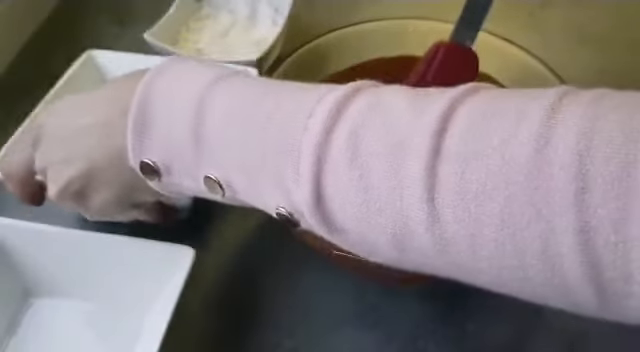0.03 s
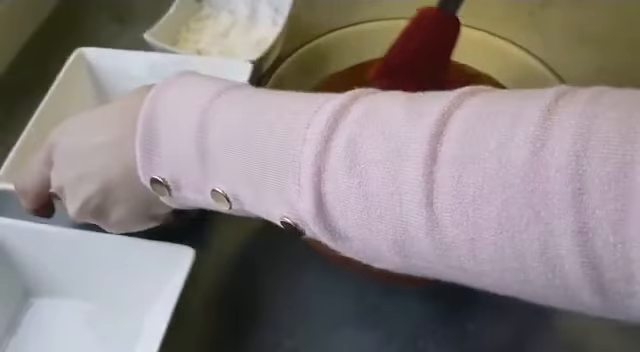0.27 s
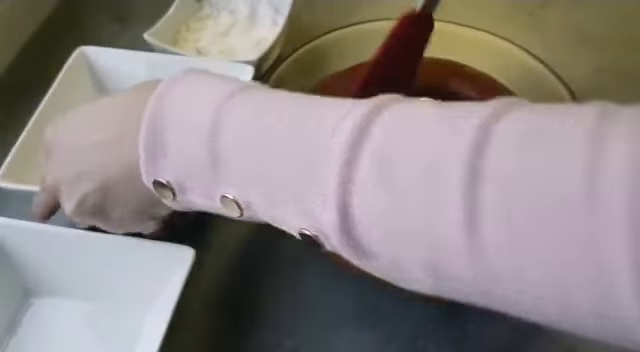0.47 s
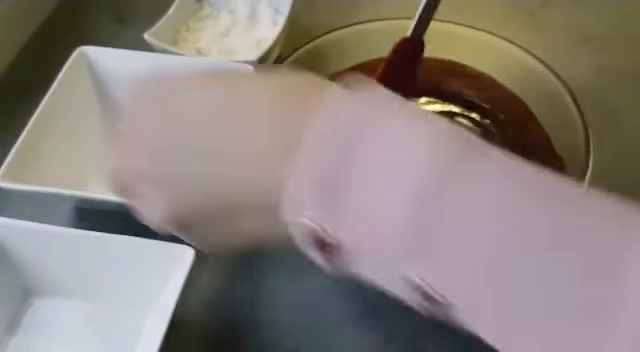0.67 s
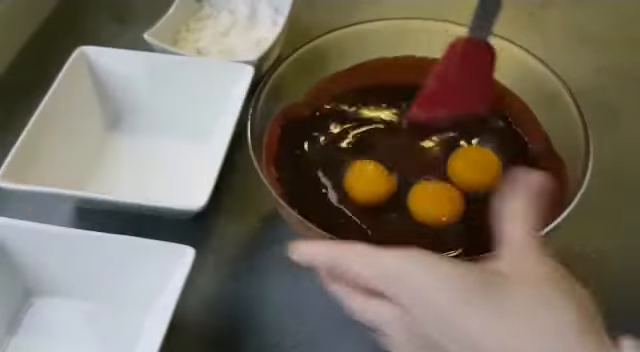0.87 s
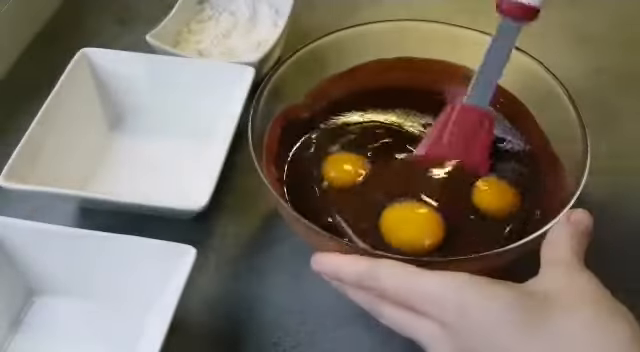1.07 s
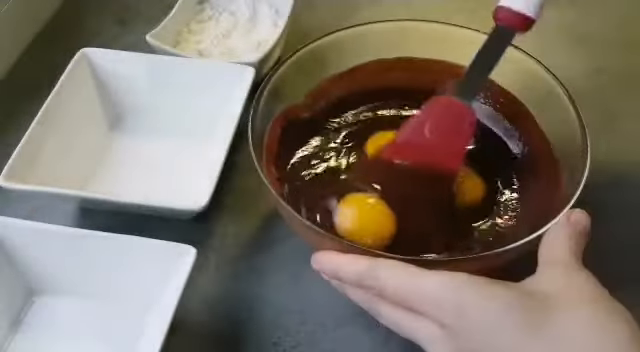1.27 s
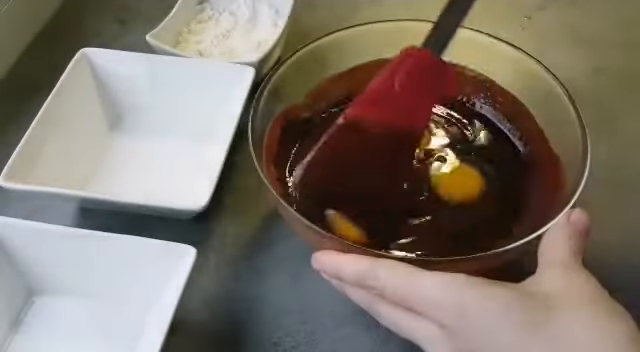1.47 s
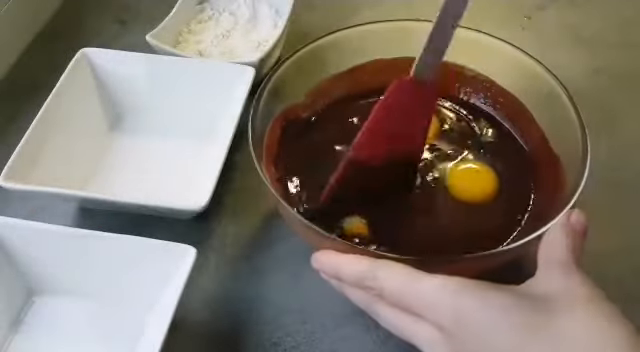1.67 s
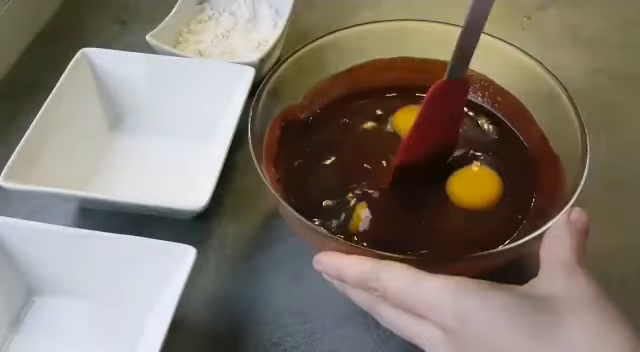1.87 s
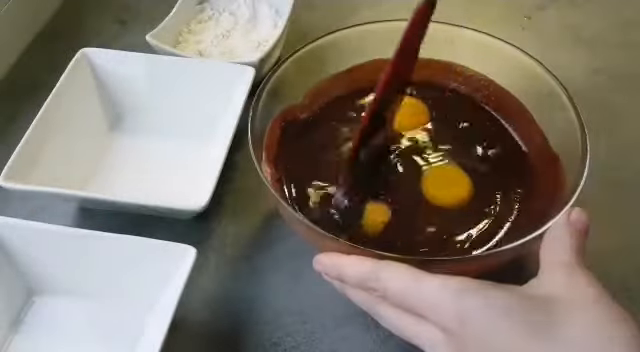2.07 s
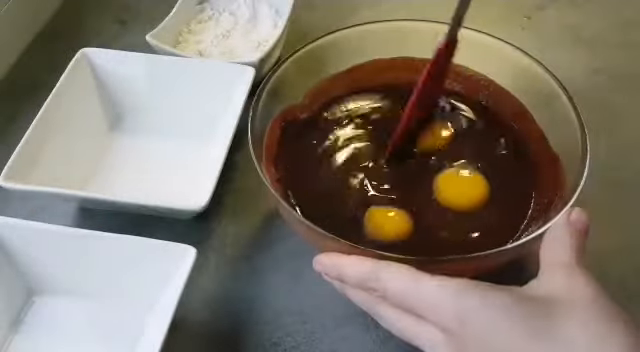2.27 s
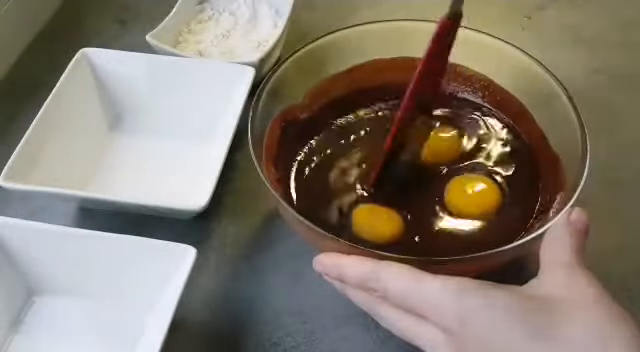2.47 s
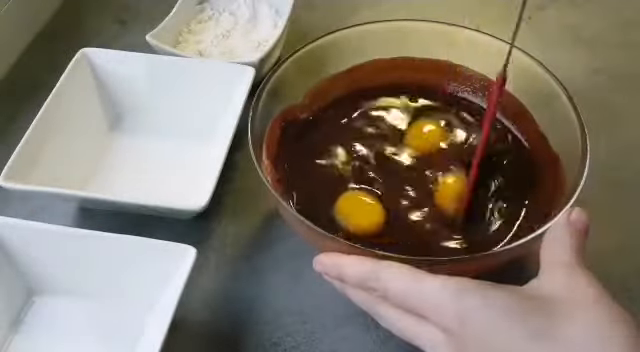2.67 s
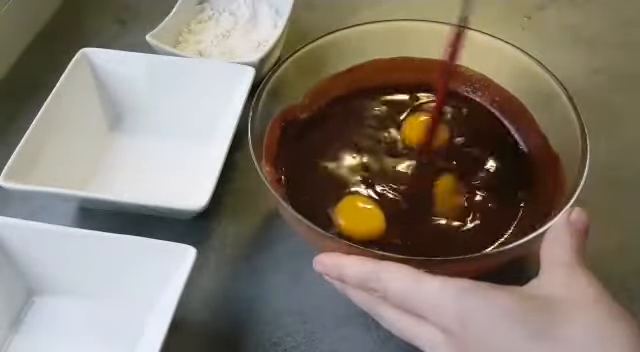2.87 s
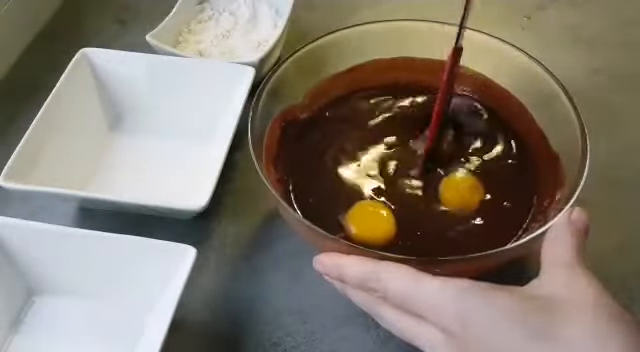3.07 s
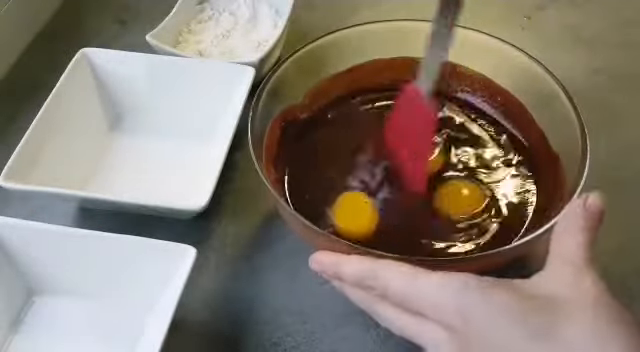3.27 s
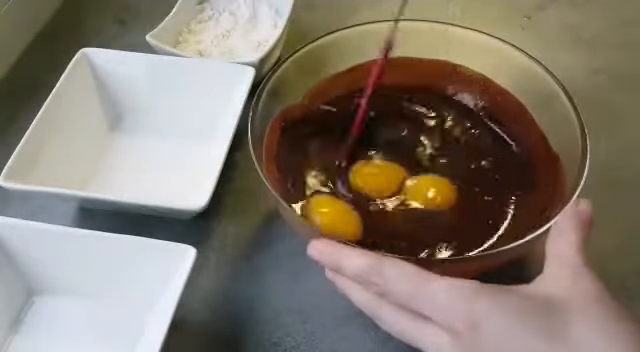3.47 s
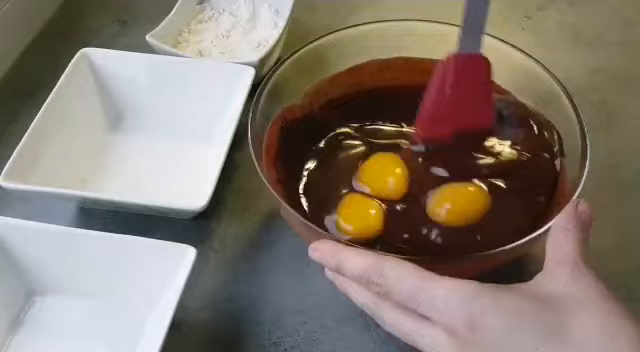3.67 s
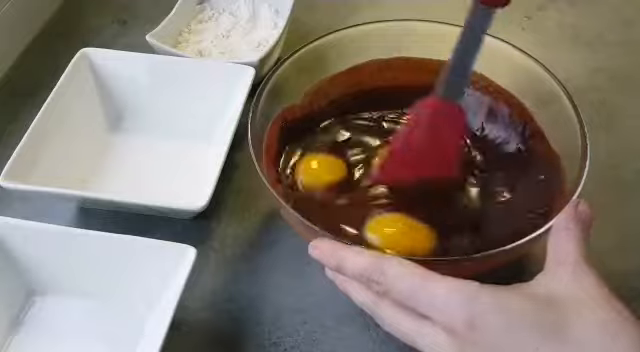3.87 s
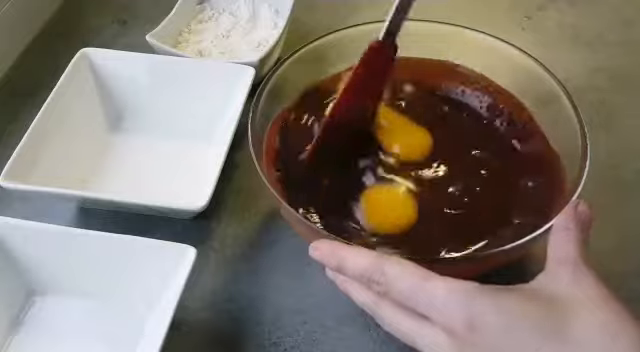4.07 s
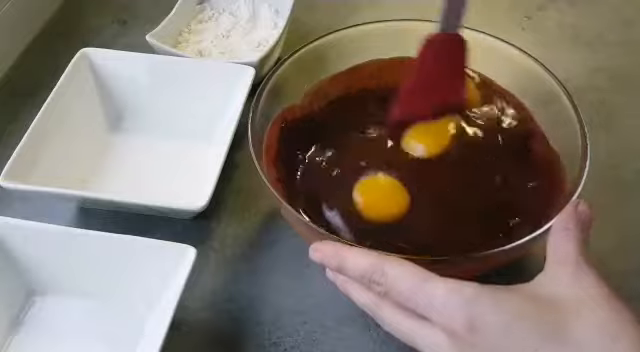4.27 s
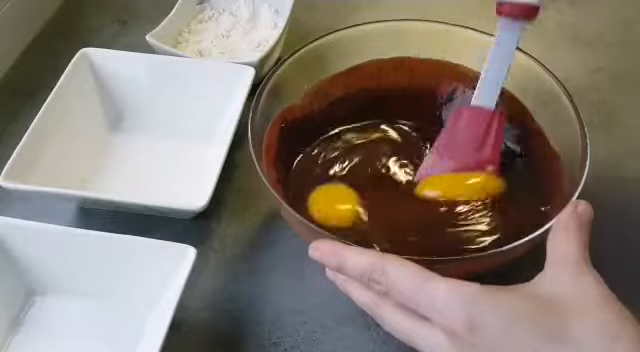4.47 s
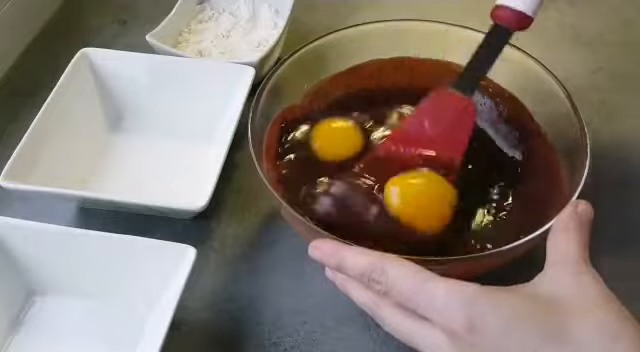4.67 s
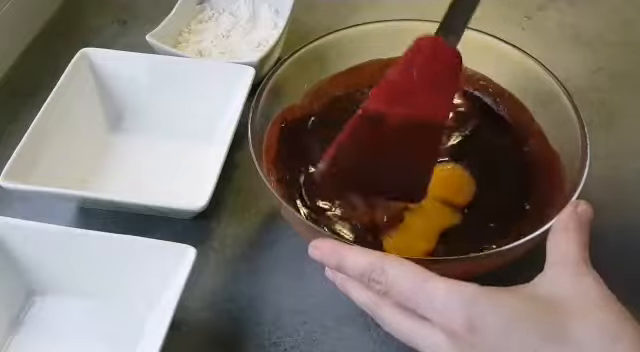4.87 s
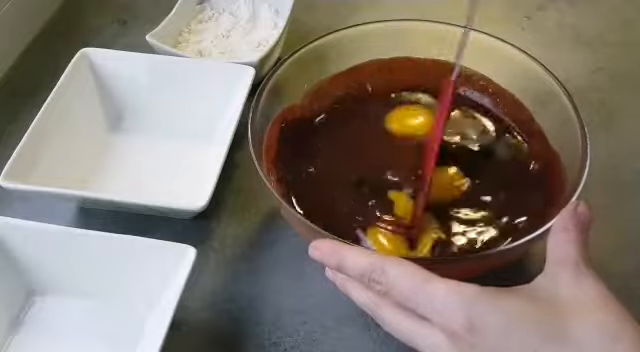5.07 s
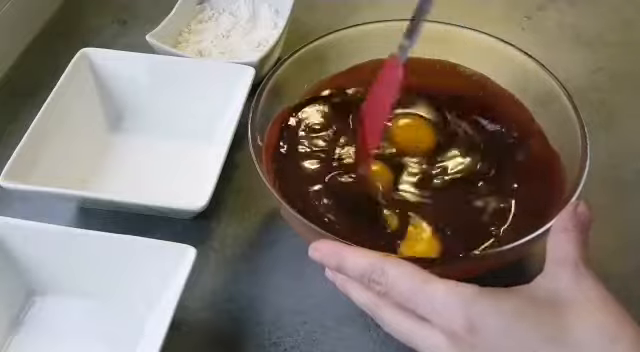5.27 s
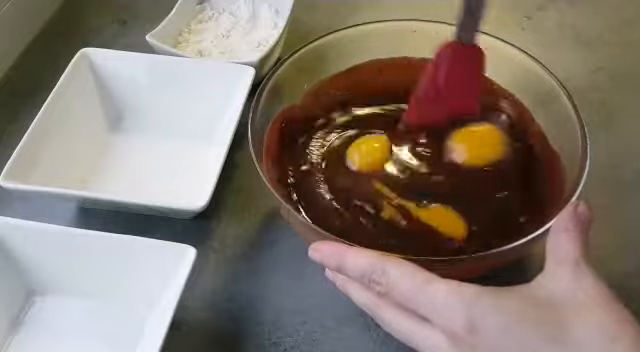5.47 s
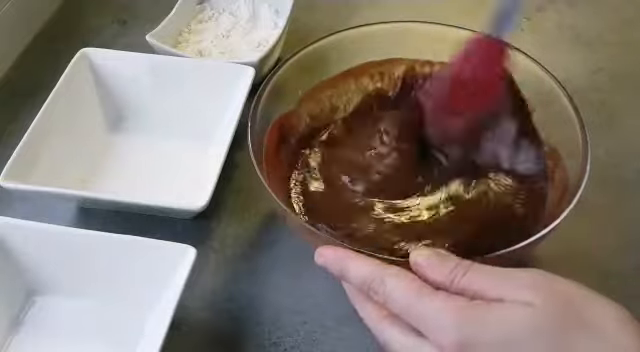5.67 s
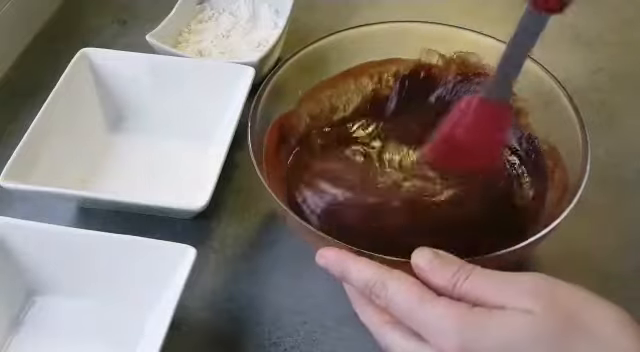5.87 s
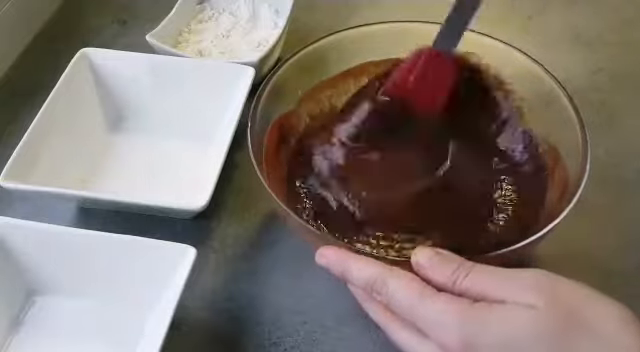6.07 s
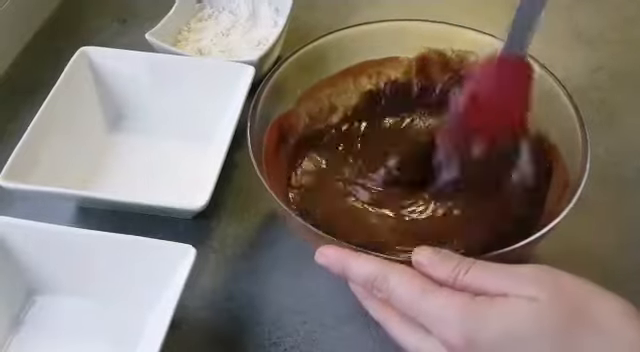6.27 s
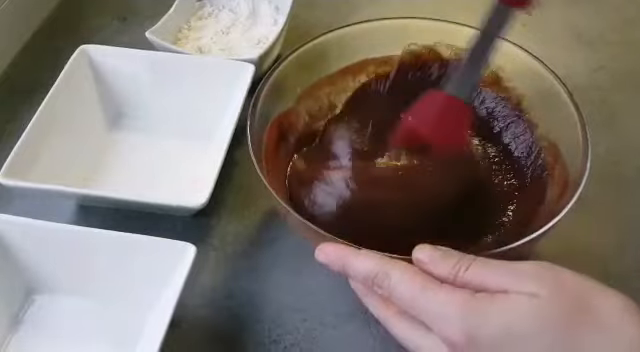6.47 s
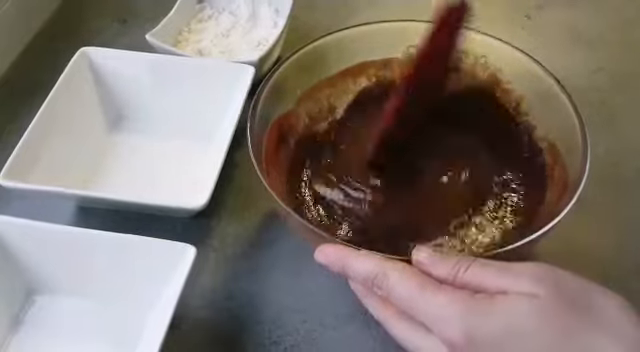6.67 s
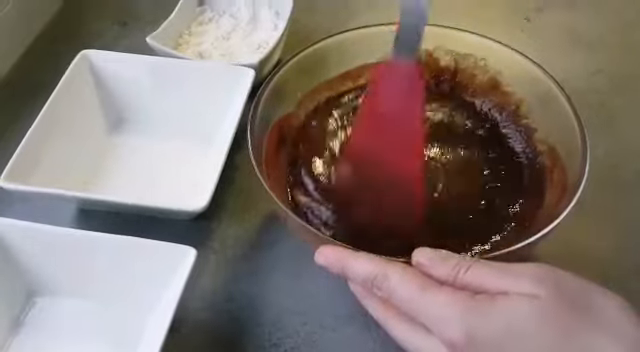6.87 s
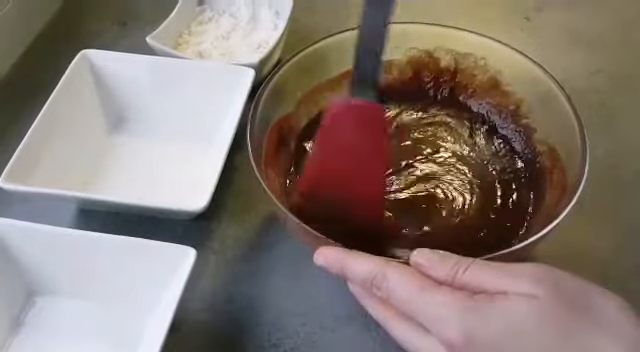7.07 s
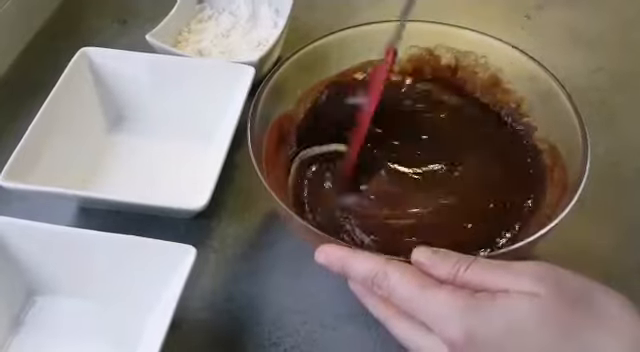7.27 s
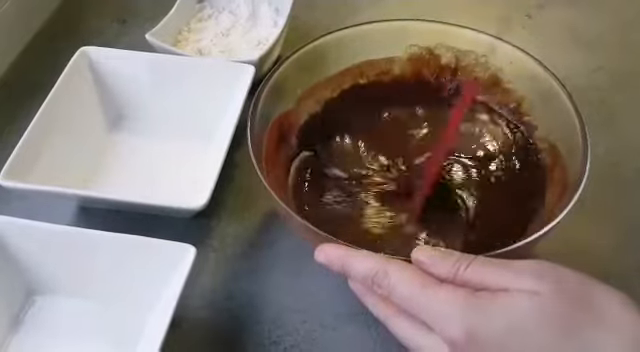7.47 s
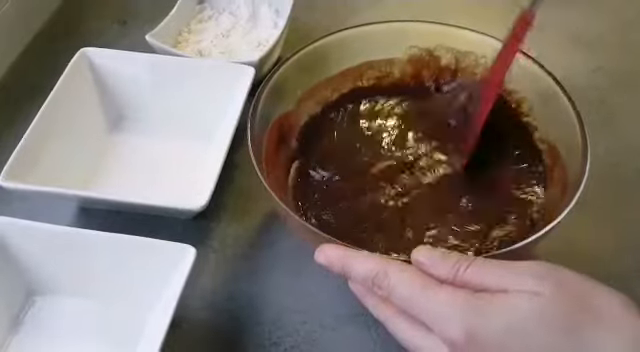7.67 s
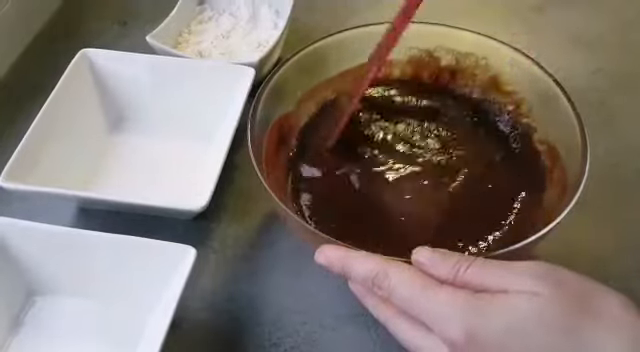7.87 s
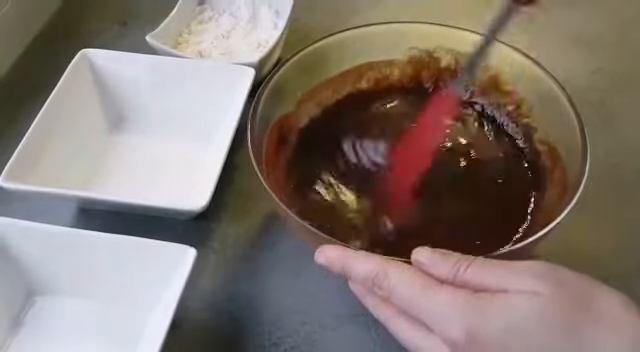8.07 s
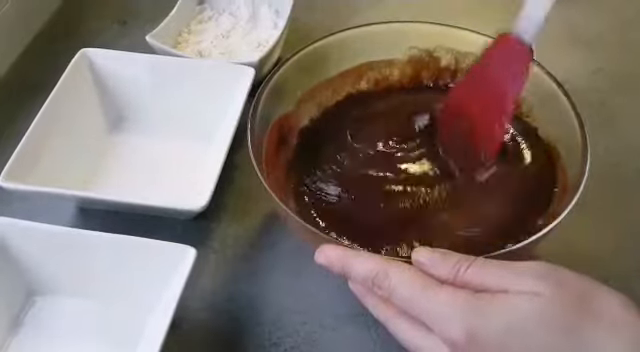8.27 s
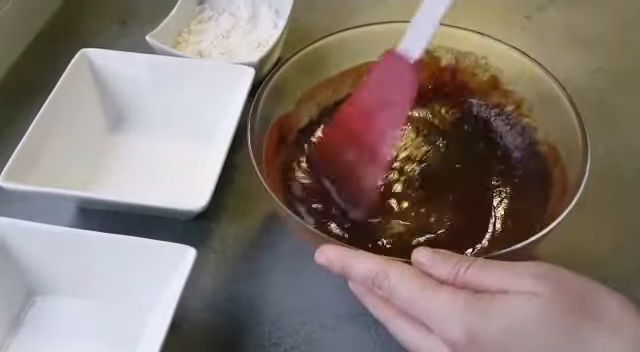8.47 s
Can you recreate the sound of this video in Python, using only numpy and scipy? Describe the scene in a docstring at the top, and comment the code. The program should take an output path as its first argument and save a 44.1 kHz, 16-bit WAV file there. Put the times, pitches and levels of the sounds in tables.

```python
"""A spatula stirs thick batter in a glass bowl, just after a dish is set down on a kitchen counter.
Each knock layers a crack of bright noise, a short damped ring of modes and a thud of the counter.
The batter crackles as films tear, each a tiny ring, and smacks as air pockets pop in rising tones.
A small hard room adds a tail of decaying noise bands, over filtered hiss and a wavering hum."""
import sys
import numpy as np
from scipy import signal
from scipy.io import wavfile

SR = 44100
rng = np.random.default_rng(int(sys.argv[2]) if len(sys.argv) > 2 else 0)


def persist_wave(psi):
    """Save psi, clipped to +-1, as 16-bit WAV."""
    counts = np.round(np.clip(psi, -1, 1) * 32767).astype(np.int16)
    wavfile.write(sys.argv[1], SR, np.atleast_2d(counts).T)


N = 376613   # length [samples]

SCATTER_DB = 2.8   # each blow meets each mode differently
ONSET_CYCLES = 0.4   # a yielding contact lets each mode swell over part of a cycle
DETUNE = 0.015   # spread of the modes' pitch from blow to blow [share of pitch]
CONTACT_S = 0.003   # a contact rolls on: modes start anywhere within this time


def from_db(db):
    """Gain of a level in dB."""
    return 10 ** (np.asarray(db) / 20)


def rms_one(x):
    """Scaled to rms 1."""
    return x / np.sqrt(np.mean(x ** 2) + 1e-30)


def at_hz(points, hz):
    """Reads a (frequency [Hz], value) table on a log frequency axis."""
    table_hz, values = np.array(points).T
    return np.interp(np.log(hz), np.log(table_hz), values)


def pan_gains(pan_db):
    """Left and right gains that differ by pan_db; positive leans left."""
    return from_db(np.array([[0.5], [-0.5]]) * pan_db)


def clicks(s, db, pan_db):
    """Stereo click train that excites the resonators."""
    out = np.full((2, N), 1e-18)
    out[:, np.round(s * SR).astype(int)] = from_db(db) * pan_gains(pan_db)
    return out


def ring(train, hz, t60):
    """Two-pole resonator: a unit click sets a sine of height 1 ringing, 60 dB down after t60."""
    radius = from_db(-60 / (t60 * SR))
    angle = 2 * np.pi * hz / SR
    return signal.lfilter([0, np.sin(angle)], [1, -2 * radius * np.cos(angle), radius ** 2], train)


def single_rings(table, pan_db):
    """Free modes, each set off once by a click: (time [s], level [dB], pitch [Hz], t60 [s])."""
    return sum(ring(clicks(np.array([s]), db, pan_db), hz, t60) for s, db, hz, t60 in table)


def soft(x, hz):
    """A yielding contact passes only the lows."""
    return signal.sosfilt(signal.butter(2, hz, fs=SR, output="sos"), x)


def later(x, left, right):
    """Delays each channel by its own number of samples."""
    return np.array([np.roll(x[0], left), np.roll(x[1], right)])


def stereo_bands(size, likeness):
    """Yields centre Hz and a half-octave band of stereo noise, flat per Hz."""
    white = rng.standard_normal((2, 2, size))
    edges = 20 * 2 ** np.arange(0, 10, 0.5)
    for k, (low, high) in enumerate(zip(edges, edges[1:])):
        centre = np.sqrt(low * high)
        band = signal.butter(2, [low, high], "band", fs=SR, output="sos")
        mid, side = signal.sosfilt(band, white[k % 2])
        alike = np.clip(at_hz(likeness, centre), 0, 1)
        yield centre, np.sqrt(1 + alike) * mid + np.sqrt(1 - alike) * side * [[1], [-1]]


def air():
    """Room rumble and hiss as shaped noise; appliance tones as resonators fed by noise, so they waver."""
    # noise spectrum: (frequency [Hz], relative level [dB per Hz])
    air_spectrum = [(20, -27), (40, 1.5), (70, -7), (105, 5), (160, -10.5), (250, -5.5), (500, -11),
                    (1000, -14.5), (2400, -18.5), (4000, -23.5), (8500, -32.5), (11000, -40),
                    (13500, -14.5), (15000, -33)]
    # (frequency [Hz], left-right likeness [0-1])
    air_likeness = [(28, .6), (60, 1), (240, 0.09), (950, 0.018), (3770, 0), (15000, 0)]
    # appliance tones: (frequency [Hz], level [dB rms], steadiness as t60 [s])
    hum_tones = [(99, -75.5, 0.13), (230, -75.5, 0.28), (450, -81, 1)]
    bands = stereo_bands(N, air_likeness)
    hiss = rms_one(sum(from_db(at_hz(air_spectrum, hz)) * band for hz, band in bands))
    hum = 0
    for hz, db, steady_s in hum_tones:
        hum = hum + from_db(db) * rms_one(ring(rng.standard_normal(N), hz, steady_s))
    return from_db(-66) * hiss + hum


def damped(modes, t60):
    """Gives every mode a decay: t60 up to 800 Hz, shorter above."""
    return [(hz, db, t60 * min(1, 800 / hz) ** 1.1) for hz, db in modes]


def struck(modes, s, db, centre_hz, pan_db, reach, count=2, detune=0, contact_s=0):
    """Blows favour modes near their centre: about reach dB are lost an octave away, most close by."""
    hz, level_db, t60 = np.transpose(modes)
    octaves = np.abs(np.log2(hz / np.reshape(centre_hz, (-1, 1))))
    share = level_db - reach * np.sqrt(octaves + 0.013)
    share = share + SCATTER_DB * rng.standard_normal((len(s), len(hz)))
    # the modes of a blow share its energy
    share = share - 10 * np.log10(np.sum(from_db(share) ** 2, axis=1, keepdims=True))
    pitch = hz * (1 + detune * rng.standard_normal(share.shape))
    start = contact_s * rng.random(share.shape)
    # runs of count neighbouring modes share a sign, the next run is opposed; long runs sharpen the onset
    sign = (-1) ** (np.arange(len(hz)) // count)
    t = np.arange(round(1.3 * t60.max() * SR)) / SR
    out = np.zeros((2, N))
    for i, pan in enumerate(np.broadcast_to(pan_db, len(s))):
        age = np.maximum(t[:, None] - start[i], 0)
        swell = np.minimum(age * hz / ONSET_CYCLES, 1)
        tones = np.sin(2 * np.pi * pitch[i] * age) * from_db(-60 * age / t60) * swell
        blow = tones @ (sign * from_db(db[i] + share[i]))
        first = round(s[i] * SR)
        out[:, first:first + len(t)] += pan_gains(pan) * blow
    return out


def crack(s, db, pan_db, low_hz, t60):
    """Contact roughness: a short decaying burst of bright noise, partly alike left and right."""
    envelope = signal.lfilter([1], [1, -from_db(-60 / (t60 * SR))], clicks(s, db, pan_db))
    noise = rng.standard_normal(N) + 0.48 * rng.standard_normal((2, N))
    return signal.sosfilt(signal.butter(2, low_hz, "high", fs=SR, output="sos"), envelope * noise)


def thud(s, db, centre_hz, pan_db, reach, soft_hz):
    """The counter's low modes answer a push, and once more as the lows return from the far wall."""
    # counter and cupboard under it: (frequency [Hz], level [dB])
    counter_modes = [(100, -6), (125, 4.5), (156, -2.5), (180, 4), (205, -4.5), (228, 0), (264, -5),
                     (305, 1.5), (340, -3), (376, -2), (422, -8), (480, -3.5)]
    echo_s, echo_db = 0.02423, -18.5
    modes = damped(counter_modes, t60=0.12)
    push = struck(modes, s, db, centre_hz, pan_db, reach, count=1, detune=DETUNE)
    echo = from_db(echo_db) * np.roll(push, round(echo_s * SR), axis=1)
    return soft(push + echo, soft_hz)


def dish():
    """The dish lands, rocks and settles; the sharper the contact, the stronger the high tones after it."""
    # contacts: (time [s], ring level [dB], ring centre [Hz], focus [dB lost an octave away],
    # thud level [dB], thud centre [Hz], grit level [dB])
    contacts = [(0.151, -3, 895, 4, -9, 156, -28.5), (0.373, -12.5, 787, 13.5, -17.5, 230, -59.5),
                (0.4355, -4.5, 950, 11, -16, 170, -29.5), (0.444, -6, 1000, 4, -18, 156, -40.5),
                (0.46, -11, 700, 3.5, -32, 156, -48), (0.555, -19.5, 1100, 9, -26, 156, -59)]
    # dish and counter top: (frequency [Hz], level [dB])
    dish_modes = [(470, -2), (522, -9), (585, -18), (646, -1.5), (697, -17), (735, -15), (795, -4),
                  (856, -7.5), (920, -4.5), (984, -4), (1088, -2.5), (1160, -4), (1237, -1), (1362, -5),
                  (1492, -3.5), (1757, -6.5), (2013, -1.5), (2400, -4), (2850, 0.5), (3350, -6.5),
                  (3900, -10), (4500, -12)]
    # high tones after each contact: (frequency [Hz], level [dB], t60 [s])
    high_modes = [(5490, -11.5, 0.076), (6260, -6, 0.098), (7650, -3, 0.12), (8600, -8.5, .1),
                  (11000, -5, .08), (12100, -6, 0.087)]
    # a dish touched on the way rings: (time [s], level [dB], pitch [Hz], t60 [s])
    neighbour_rings = [(.453, -38, 2993, .2), (.572, -54, 3100, .15)]
    s, db, hz, focus, thud_db, thud_hz, grit_db = np.transpose(contacts)
    reach = np.clip(focus, 0, 60)[:, None]
    body = struck(damped(dish_modes, t60=0.04), s, db, hz, 2.88, reach,
                  count=3, detune=DETUNE, contact_s=CONTACT_S)
    high_tones = struck(high_modes, s, grit_db - 25, hz, 2.55, reach=0)
    neighbour = single_rings(neighbour_rings, pan_db=9.13)
    grit = soft(crack(s, grit_db, 2.0, low_hz=1500, t60=0.028), hz=3241)
    low = thud(s, thud_db, thud_hz, 0.3, reach=16.0, soft_hz=710.0)
    return later(soft(body, hz=1900) + low + high_tones + neighbour + grit, 0, 8)


def knocks():
    """Each touch of the spatula wakes glass, wall and rim modes, the counter and a bright crack."""
    # touches: (time [s], ring level [dB], ring centre [Hz], focus [dB lost an octave away; below 0 as 0],
    # thud level [dB], thud centre [Hz], edge level [dB], rim trim over edge [dB], left minus right [dB])
    touches = [(0.877, -32, 1670, 16, -33, 236, -61, 14, 3), (1.039, -35, 1300, 23, -45, 290, -63, 19.5, 4),
               (1.114, -53, 1350, 35, -49.5, 132, -69, 8, 5), (1.815, -35, 1350, 22, -39.5, 280, -51, 8, 3),
               (1.895, -31.5, 640, 32, -21.5, 180, -81, 14, 1),
               (1.929, -25.5, 1150, 17, -23.5, 171, -43, 13, 2),
               (2.366, -24, 1240, 17.5, -30.5, 305, -61, 6.5, 4),
               (2.812, -28, 1660, 10, -23, 189, -44, 4, 1.5), (2.968, -61, 740, 31, -43, 191, -80, 11, -6),
               (3.155, -17.5, 890, 13.5, -20.5, 275.5, -47.5, 14, 4),
               (3.198, -44, 1000, -2, -51, 295, -50.5, 10.5, 0),
               (3.321, -31.5, 1630, 7, -27, 231, -52.5, 11.5, 2.5),
               (3.463, -41, 1600, 15, -43.5, 375, -65.5, 9, 3),
               (3.517, -28.5, 1000, 22, -26, 244, -42, 2.5, 1.5),
               (3.653, -35, 1520, 8.5, -37.5, 327, -67, 8.5, 3),
               (3.745, -35, 1310, 23, -34.5, 244, -58, 11, 3.5),
               (3.839, -29.5, 1310, 26, -30, 193, -57, 18, 4.5),
               (3.943, -46, 1380, 46, -49, 180, -67, 12, 2),
               (3.967, -40.5, 1280, 14, -34.5, 298, -63, 16, 4),
               (4.044, -78, 1970, 7, -56, 200, -60.5, 9, 6), (4.24, -33, 1080, 7, -31, 180, -60, 19, 2),
               (4.322, -49, 1080, -8, -73, 220, -81, 32, 2), (4.439, -39, 1530, 25, -39, 158, -76, 18.5, 2),
               (4.67, -20, 1020, 5.5, -25.5, 214, -66.5, 18, 3.5),
               (5.221, -39, 850, 17, -36.5, 274, -64, 10.5, 1),
               (5.289, -42, 760, 25, -32.5, 260, -80, 15.5, 1),
               (5.337, -29, 1000, 2, -34.5, 306, -48.5, 8.5, 2),
               (5.495, -49.5, 1740, 13, -56, 330, -68, 11, 0.4),
               (5.511, -45, 965, -3, -40.5, 244, -78, 25.5, 4.5),
               (5.594, -31.5, 1540, 22, -38, 174, -56, 16.5, 4.5),
               (6.107, -23.5, 825, 7.5, -24.5, 206, -44, 4.5, 3),
               (6.335, -45.5, 1340, 27, -53, 146, -78, 13, 4), (6.387, -44, 690, 23, -30, 212, -86, 13, 1),
               (6.46, -27.5, 1620, 24, -29, 125, -56.5, 15.5, 2),
               (6.562, -45.5, 2030, 13, -39.5, 200, -75.5, 17, 11),
               (6.715, -43, 676, 19, -32.5, 204, -81, 15, 0),
               (7.058, -21.5, 1990, 24, -28.5, 224, -55, 12, 2),
               (7.119, -22.5, 2100, 24, -35, 277, -64.5, 12.5, 3.5),
               (7.253, -53, 795, 24, -60, 400, -74.5, 11, 1), (7.27, -43, 665, 45, -33, 204, -67, -2, 3),
               (7.74, -21, 1870, 30.5, -42.5, 274, -59, 10.5, 3),
               (8.042, -27.5, 1460, 14, -37.5, 350, -71, 17, 3),
               (8.072, -59, 1180, 29, -38.5, 125, -69, 7, 8)]
    # glass damped by batter and hand: (frequency [Hz], t60 [s])
    bowl_modes = [(575, .03), (645, .03), (740, .025), (834, .02), (1000, .05), (1180, .018), (1380, .015),
                  (1500, .02), (1660, .016), (1850, .013), (2030, .015), (2250, .012), (2620, .007),
                  (2850, .007), (3150, .006), (3500, .005), (3950, .005), (4550, .005), (5300, .004),
                  (5850, .004), (6700, .004)]
    # glass left bare by the batter rings on: (time [s], level [dB], pitch [Hz], t60 [s])
    free_rings = [(3.517, -36, 991, .3), (3.517, -33, 1500, .03), (7.058, -25, 2073, .05),
                  (7.117, -30, 1900, .04)]
    wall_hz, rim_hz = 2200, 3400   # modes above belong to the upper wall, then to the rim
    wall_db, wall_db_per_octave = -7, 12   # touches with a higher ring centre wake the wall more
    wall_follows_ring = 0.45   # share of the ring's lead over the edge that the wall takes on
    bright_detune = 0.07   # batter and hand shift wall and rim modes more [share of pitch]
    s, db, hz, focus, thud_db, thud_hz, edge_db, rim_db, pan_db = np.transpose(touches)
    modes = np.insert(np.array(bowl_modes), 1, 0, axis=1)   # all equally strong
    part = np.digitize(modes[:, 0], [wall_hz, rim_hz])
    reach = np.clip(focus, 0, 60)[:, None]
    glass = struck(modes[part == 0], s, db, hz, pan_db, reach, detune=DETUNE)
    height_db = wall_db + wall_db_per_octave * np.log2(hz / 1000)
    wall_level = edge_db + rim_db + height_db + wall_follows_ring * (db - edge_db)
    wall = struck(modes[part == 1], s, wall_level, hz, pan_db, reach=0,
                  detune=bright_detune, contact_s=CONTACT_S)
    rim = struck(modes[part == 2], s, edge_db + rim_db + 5.5, hz, pan_db, reach=0,
                 detune=bright_detune, contact_s=CONTACT_S)
    low = thud(s, thud_db, thud_hz, -1.3, reach=13.5, soft_hz=640.0)
    # the bright edge leans further left than the ring
    snap = crack(s, edge_db, pan_db + 5.5, low_hz=2460, t60=0.029)
    free = single_rings(free_rings, pan_db=1.9)
    return later(soft(glass, hz=3500) + free + wall + low, 2, 0) + later(rim + snap, 1, 0)


def crackle():
    """Tiny films tear at random behind the blade, each ringing a few cycles; bursts swell, hold and fade."""
    # bursts: (start [s], length [s], level [dB])
    bursts = [(3.45, 0.055, -60), (4.006, 0.016, -63), (6.312, 0.048, -63.5), (6.527, 0.13, -61.5),
              (7.3, 0.098, -65)]
    # (frequency [Hz], grain level [dB])
    grain_colour = [(800, -7.5), (1500, -3), (2500, -4.5), (5000, -10), (9000, -11), (14000, -6)]
    attack_s, release_s = 0.023, 0.039
    grain_cycles, grains_per_s = 14, 6000   # cycles until a grain is 60 dB down; mean rate
    t, level = np.arange(N) / SR, np.zeros(N)
    for s, length, db in bursts:
        swell = np.clip((t - s) / attack_s, 0, 1)
        fade = np.exp(-np.maximum(t - s - length, 0) / release_s)
        level += from_db(db) * swell * fade
    sizes = from_db(3.5 * np.minimum(rng.exponential(1, N), 4)) * rng.choice([-1, 1], N)
    born = rng.random(N) < grains_per_s / SR
    dealt = rng.integers(0, 20, N)   # which of the 20 pitches each grain takes
    grains = 0
    for k, hz in enumerate(np.geomspace(900, 13000, num=20)):
        train = sizes * born * (dealt == k) + 1e-18
        grains = grains + from_db(at_hz(grain_colour, hz)) * ring(train, hz, grain_cycles / hz)
    return level * rms_one(grains)


def pops():
    """Air pockets popping in the batter: each rings some cycles at its own, rising pitch."""
    # (time [s], level [dB], starting pitch [Hz])
    pockets = [(6.564, -33.5, 1300), (6.592, -35, 1290), (6.600, -28, 1276), (6.618, -29, 1156),
               (6.63, -38, 1240), (6.659, -34, 1500), (6.669, -36.5, 1670), (7.336, -45, 3280),
               (7.393, -44, 2460)]
    decay_cycles, attack_s = 25, 0.00095   # cycles of the starting pitch until 60 dB down
    rise_per_s = 4.2   # pitch rise [share of starting pitch per second]
    out, t = np.zeros(N), np.arange(SR // 10) / SR
    for s, db, hz in pockets:
        phase = 2 * np.pi * hz * t * (1 + rise_per_s / 2 * t)
        tone = np.sin(phase) * from_db(-60 * t * hz / decay_cycles)
        first = round(s * SR)
        out[first:first + len(t)] += from_db(db) * tone * (1 - np.exp(-t / attack_s))
    return out


def kitchen(x):
    """Direct sound plus a diffuse tail that dies band by band; lows take longer to build."""
    # (frequency [Hz], t60 [s])
    room_t60 = [(100, 0.59), (500, 0.42), (1500, 0.29), (4000, 0.3), (10000, 0.18)]
    # (frequency [Hz], tail level [dB])
    room_level = [(100, -11.5), (300, -2.5), (700, -4.5), (1500, -7.5), (4000, -6), (10000, -3.5)]
    # (frequency [Hz], left-right likeness [0-1])
    room_likeness = [(100, 1), (300, 0.7), (600, 0.67), (1000, 0.013), (5000, .05)]
    t, tail = np.arange(SR // 2) / SR, 0
    for hz, band in stereo_bands(len(t), room_likeness):
        t60, build_s = at_hz(room_t60, hz), 0.001 + 1.0 / hz
        # the root evens out the energy of long and short decays
        dying = from_db(at_hz(room_level, hz) - 60 * t / t60) / np.sqrt(t60 * SR / 14)
        tail = tail + dying * (1 - np.exp(-(t / build_s) ** 2)) * band
    return x + signal.fftconvolve(x, tail, axes=1)[:, :N]


def scene():
    """Everything on the counter sounds in the kitchen; little of the deepest bass radiates."""
    counter = dish() + knocks() + crackle() + pops()
    low_cut = signal.butter(3, 85, "high", fs=SR, output="sos")
    return kitchen(signal.sosfilt(low_cut, counter)) + air()


def record(dry):
    """The top is cut steeply, 50 dB down from 15.3 kHz, and a small steady offset is added."""
    top_cut = signal.cheby2(12, 50, 15300, fs=SR, output="sos")
    return signal.sosfilt(top_cut, dry) - 0.0004


dry = scene()
out = record(dry)
persist_wave(out)
```